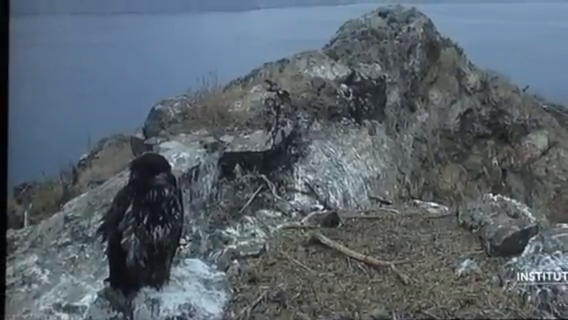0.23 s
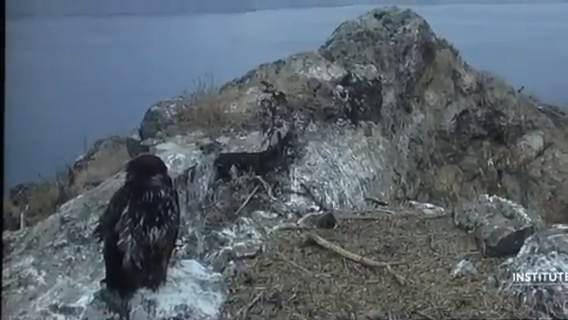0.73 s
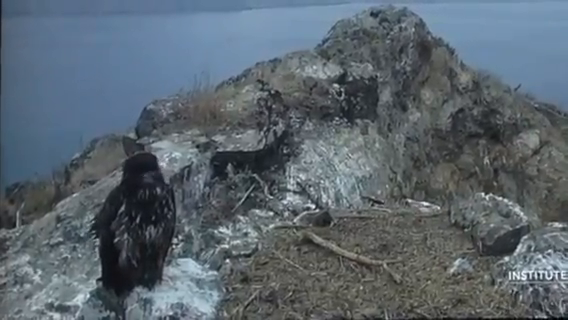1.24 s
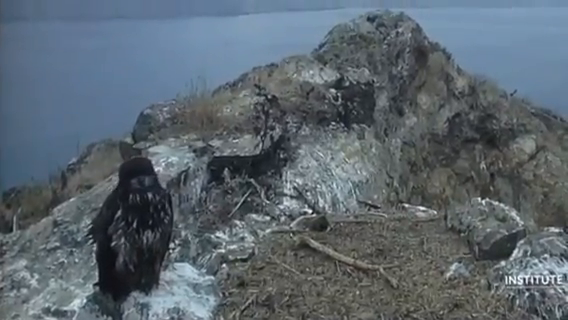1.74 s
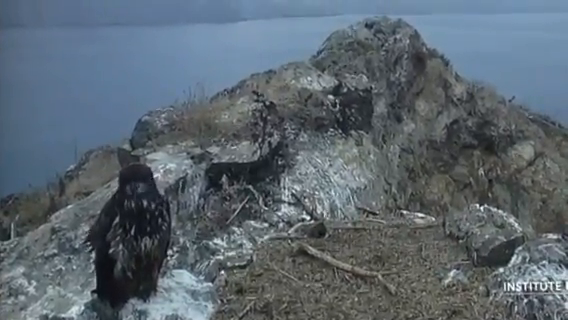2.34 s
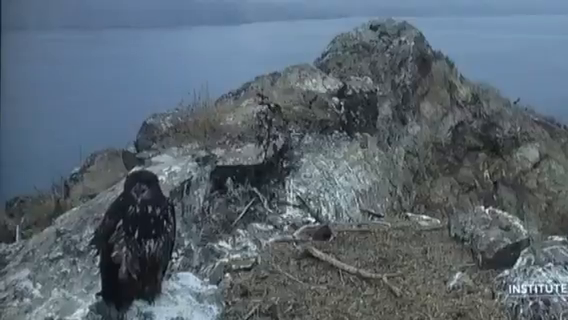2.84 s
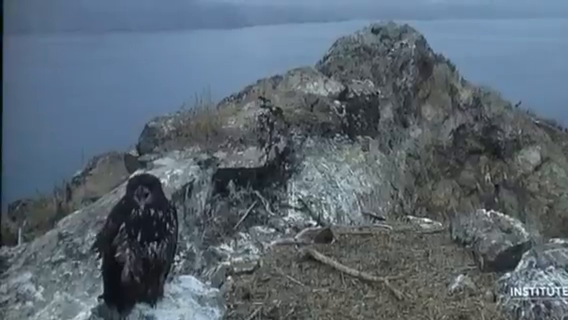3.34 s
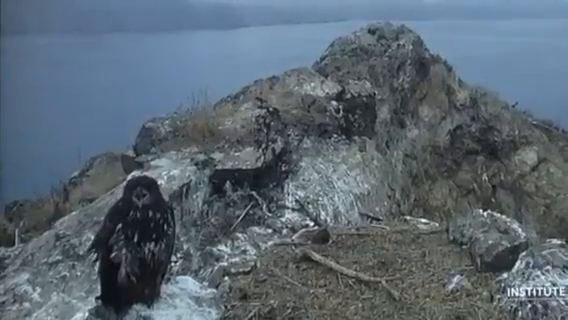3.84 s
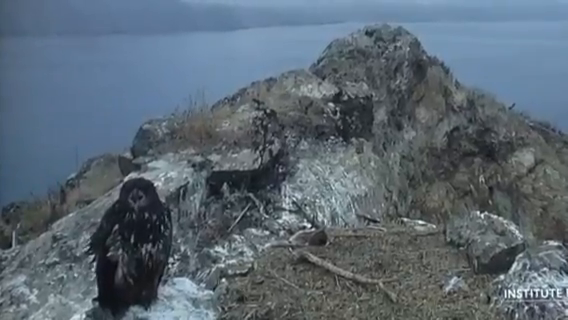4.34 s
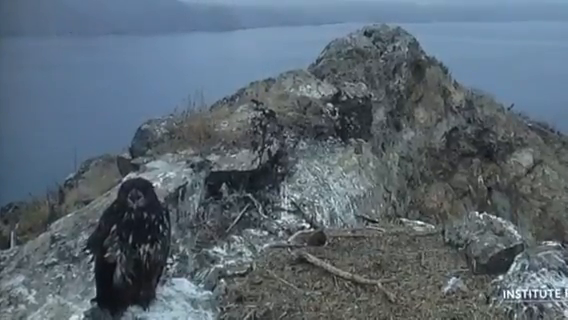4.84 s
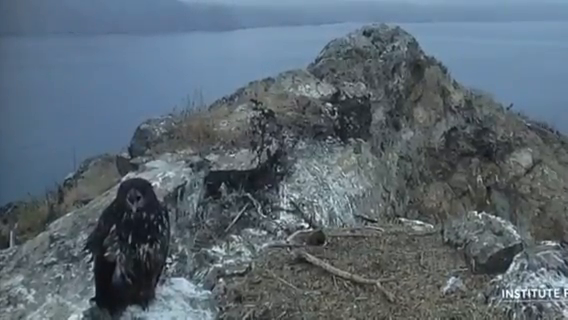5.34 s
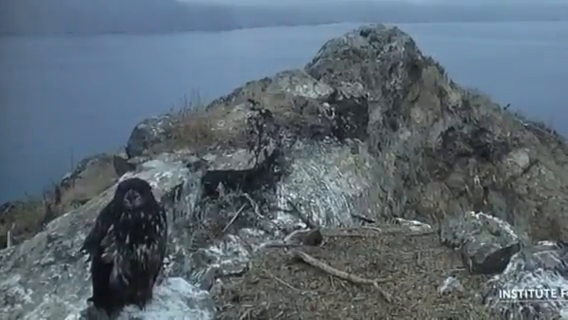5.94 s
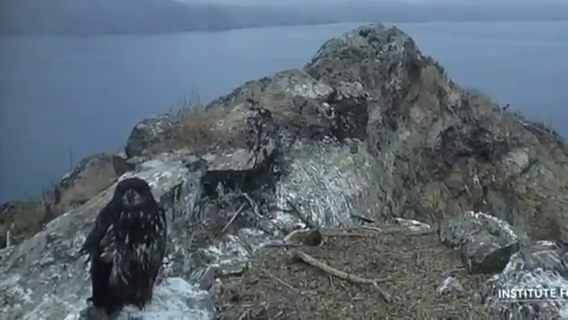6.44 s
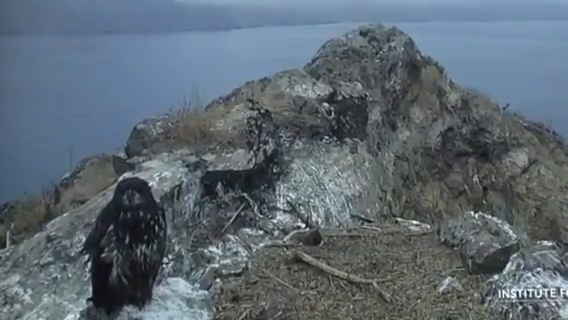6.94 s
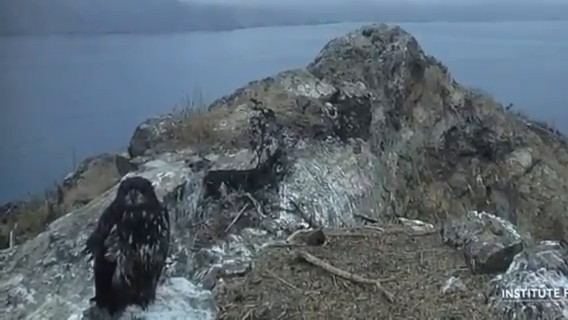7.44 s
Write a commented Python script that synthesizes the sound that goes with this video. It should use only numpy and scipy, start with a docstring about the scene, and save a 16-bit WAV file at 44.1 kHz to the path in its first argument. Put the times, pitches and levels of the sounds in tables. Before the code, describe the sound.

After seconds of dull, booming sea wash, a juvenile eagle pipes a quick bout of harsh, distorted whistles through a small speaker indoors.

```python
"""A young eagle on a sea cliff pipes twelve quick calls, over a steady wash of sea and hiss.
Each call is a low croak, a yelp, an arched whistle and a drop to a short low note with a falling grunt, all
voiced as harmonics coloured by throat and beak; the voice warms up over the bout. The wash is shaped noise.
The whistles overload the microphone at the nest: clipping adds shrill odd overtones and squeezes out the wash.
The microphone signal plays from a small loudspeaker in a room, and gain control evens the result."""
import sys
import numpy as np
from scipy import signal
from scipy.fft import rfft, irfft
from scipy.io import wavfile
from scipy.ndimage import uniform_filter1d

SR = 44100
rng = np.random.default_rng(int(sys.argv[2]) if len(sys.argv) > 2 else 0)


def wrap_up_sound(samples):
    """Save the sound to the file named by the first command line argument, as 16-bit audio."""
    columns = np.atleast_2d(samples).T
    # keep every value between -1 and 1, then stretch to whole-number steps
    tamed = np.clip(columns, -1, 1)
    steps = np.round(tamed * 32767).astype(np.int16)
    wavfile.write(sys.argv[1], SR, steps)


N = 339349
TIME = np.arange(N) / SR  # s
BIN_HZ = np.maximum(np.arange(N // 2 + 1) * SR / N, 1)

# sea wash and hiss, spectrum shape before it is scaled to its level: [f/Hz, relative density level/dB]
WASH_SPECTRUM = [(20, -78), (57, -21.5), (112, -22), (160, -8), (235, -13), (300, -25.5), (400, -12.5),
                 (630, -13), (950, -20), (2600, -22), (4300, -22.5), (5500, -21), (8250, -31),
                 (10000, -21.5), (15500, -39)]
# boom and ringing in the wash, on the same relative scale: [f/Hz, width at half power/Hz, level/dB]
WASH_RESONANCES = [(164, 23, -1), (185.1, 24.7, 2.5), (456, 81, -9), (628, 28, -13), (1147, 82, -15),
                   (2270, 140, -13.5), (3950, 180, -20.5), (4434, 230, -16)]
# nearby surfaces, extra path about 1 to 14 m: [t/s after the direct sound, level/dB re direct]
REFLECTIONS = [(.0031, -9), (.0074, -11.5), (0.0114, -15.5), (0.019, -16.5), (.042, -24.5)]
# strongest room resonances: [f/Hz, level/dB before the common ringing level, t60/s]
ROOM_MODES = [(1603, -2, 0.69), (1643, -7.5, 0.12), (1767, 1, 0.14), (2027, 4.5, 0.1), (2160, -17, 0.34),
              (2425, -3.5, 0.35), (2542, 3.5, 0.31), (2530, -9, 0.12), (2680, -19.5, 0.99), (2838, 6, 0.16),
              (2971, -9, 0.035), (3345, 3.5, 0.043), (4018, 6, 0.062)]
# loudspeaker treble response: [f/Hz, level/dB]
SPEAKER_TREBLE = [(3000, 0), (5500, -1), (6700, -3.5), (7400, 6.5), (8250, 10), (9200, -2), (11000, 0.5),
                  (12800, 0), (13800, 6.5), (15500, -2)]
# colour of the voice through throat and beak: [f/Hz, level/dB]
VOICE_COLOUR = [(400, -24), (700, -21.5), (1050, -5), (1250, -35.5), (1650, -19.5), (2050, -9.5), (2400, 0),
                (2850, 1), (3300, -3.5), (3650, -38), (4100, -10.5), (4700, -29), (5600, -15), (6700, -23)]
# calls: [start t/s, yelp before the whistle t/s, whistle length t/s, flick above base f/Hz (none if negative),
#         crest f/Hz, low note f/Hz, effort level/dB re overload before voice colour, yelp level/dB likewise]
CALLS = [ (2.493, .038, 0.024, 0.5, 2104, 1960, 8.5, 4.5), (2.737, 0.017, 0.064, -1, 2447, 2040, 1, 5),
         (3.052, 0.016, 0.11, -0.5, 2671, 1977, 5, 5), (3.408, 0.0044, 0.12, 331, 2721, 1976, 6.5, -4.5),
         (3.757, 0.0031, .144, 220, 2774, 1972, 7.5, -6.5),
         (4.125, 0.0044, 0.13, 223.5, 2800, 1956, 7, -9.5), (4.465, 0.0058, 0.12, 207, 2781, 2000, 8, -7),
         (4.8, 0.0051, .110, 194.5, 2786, 1987, 8.5, -7), (5.122, .006, 0.1, 166.5, 2735, 2023, 7.5, -6.5),
         (5.416, 0.0045, 0.099, 142, 2734, 2020, 7.5, -10), (5.706, .009, 0.066, 386, 2750, 1866, 4.5, -12),
         (5.914, 0.0082, .059, 674, 2712, 1833, 2, -19)]

WASH_DB = -35.5  # rms, re overload
PLAYBACK_DB = -19.5
CUTOFF_HZ = 15450
# dull echo off the far wall, extra path about 23 m
FAR_WALL_S, FAR_WALL_DB, FAR_WALL_HZ = 0.068, -18.5, 3000
# time constant over which the cold voice warms up
WARM_UP_S = 1.6
# croak: a rough rise leading into the yelp, weaker while cold
CROAK_LEAD_S, CROAK_RISE_S, CROAK_RELEASE_S = 0.020, 0.016, 0.026
CROAK_FROM_HZ, CROAK_TO_HZ, CROAK_DB, CROAK_COLD_DB = 490, 737, -2.5, -10.5
# yelp: a short rise
YELP_FROM_HZ, YELP_TO_HZ, YELP_SHORTEST_S, YELP_EDGE_S = 1420, 1672.5, 0.0152, 0.0054
# most whistles flick up past their base pitch and settle back
FLICK_RISE_HZ, FLICK_S, SETTLE_S = 603.7, 0.01166, 0.018
# then climb from the base, flatter while cold, to the crest and sag part of the way to the low note
BASE_HZ, COLD_FLAT_HZ, SAG_S, SAG_SHARE = 2742, 416, 0.04244, 0.428
# swell of the whistle: share of the effort in dB once open, and at its end
ATTACK_S, OPEN_SHARE, END_SHARE = 0.0062, 0.46, 0.34
# drop to the low note, held briefly
DROP_S, LOW_HOLD_S, LOW_RELEASE_S, LOW_SAG_HZ_PER_S, LOW_DB = 0.005, 0.024, 0.004, 7300, -3.5
# last falling grunt, stronger while cold
GRUNT_AFTER_S, GRUNT_S, GRUNT_FROM_HZ, GRUNT_TO_HZ = 0.0098, 0.02, 1330, 1028
GRUNT_DB, GRUNT_COLD_DB = -10.5, 16.5


def from_db(db):
    """Decibels to amplitude gain."""
    return 10 ** (np.asarray(db) / 20)


def rms_one(x):
    """Scale to unit rms."""
    return x / np.sqrt(np.mean(x ** 2) + 1e-20)


def colour(points, peaks, hz):
    """Gain of a broad spectrum with bell-shaped resonances added in power."""
    at_hz, level_db = np.transpose(points)
    broad = from_db(np.interp(np.log(hz), np.log(at_hz), level_db))
    bells = 0
    for centre, width, db in peaks:
        bells = bells + from_db(db) ** 2 * 2 ** -(2 * (hz - centre) / width) ** 2
    return np.sqrt(broad ** 2 + bells)


def drift(rate_hz, size):
    """Smooth random wandering of spread 1: noise through two equal one-pole low-passes."""
    r = np.exp(-2 * np.pi * rate_hz / SR)
    noise = rng.standard_normal(size + SR // 10)  # the extra start lets the filter settle
    return rms_one(signal.lfilter([1], [1, -2 * r, r * r], noise))[-size:]


def fade_db(t, on, off, attack, release):
    """Level in dB that rises from -30, holds at 0 from on to off, and falls back."""
    off = max(on, off)
    return np.interp(t, [on - attack, on, off, off + release], [-30, 0, 0, -30])


def wash():
    """Steady sea noise and hiss with a low boom: white noise shaped by a fixed spectrum."""
    spectrum = rfft(rng.standard_normal(N)) * colour(WASH_SPECTRUM, WASH_RESONANCES, BIN_HZ)
    return from_db(WASH_DB) * rms_one(irfft(spectrum, N))


def resonance(x, hz, t60):
    """A ringing band-pass with gain 1 at its centre."""
    r = from_db(-60 / (t60 * SR))
    feed = np.array([1, 0, -1]) * (1 - r * r) / 2
    return signal.lfilter(feed, [1, -2 * r * np.cos(2 * np.pi * hz / SR), r * r], x)


def reverberation(x, t60, gap, treble_hz):
    """Dense random echoes that build up after a gap and die away, duller than the direct sound."""
    t = TIME[:SR]
    echoes = rng.standard_normal(SR) * from_db(-60 * t / t60) * np.clip(t / gap - 1, 0, 1)
    wet = signal.fftconvolve(x, echoes / np.linalg.norm(echoes))[:N]
    return signal.sosfilt(signal.butter(1, min(treble_hz, 0.45 * SR), fs=SR, output="sos"), wet)


def room(x, ring_db, near_db, far_db):
    """Direct sound, reflections, far-wall echo, resonances, a short reverberation and a faint long tail."""
    early = sum(from_db(db) * np.interp(TIME - delay, TIME, x) for delay, db in REFLECTIONS)
    dull = signal.sosfilt(signal.butter(2, FAR_WALL_HZ, fs=SR, output="sos"), x)
    echo = from_db(FAR_WALL_DB) * np.interp(TIME - FAR_WALL_S, TIME, dull)
    modes = sum(from_db(db) * resonance(x, hz, t60) for hz, db, t60 in ROOM_MODES)
    ringing = from_db(ring_db) * modes
    near = from_db(near_db) * reverberation(x, t60=0.2, gap=0.0059, treble_hz=3600)
    far = from_db(far_db) * reverberation(x, t60=3.47, gap=0.044, treble_hz=2500)
    return x + early + echo + ringing + near + far


def loudspeaker(x):
    """A small loudspeaker: no deep bass, and an uneven treble with a shrill peak."""
    bright = irfft(rfft(x) * colour(SPEAKER_TREBLE, [], BIN_HZ), N)
    return signal.sosfilt(signal.butter(3, 54, "high", fs=SR, output="sos"), bright)


def overload(x, offset, oversampling=4):
    """Microphone overload: slightly lopsided clipping near height 1, at a raised sample rate."""
    fine = signal.resample_poly(x, oversampling, 1)
    clipped = np.clip(fine, offset - 1, offset + 1)
    return signal.resample_poly(clipped, 1, oversampling)


def gain_control(x, threshold_db, slope, release_db_per_s, attack_s):
    """Turns down quickly above the threshold and recovers at a steady rate in dB."""
    level_db = 10 * np.log10(np.maximum(uniform_filter1d(x ** 2, size=128), 1e-12))
    cut_db = slope * np.maximum(level_db - threshold_db, 0)
    recovery_db = release_db_per_s * TIME
    held_db = np.maximum.accumulate(cut_db + recovery_db) - recovery_db
    r = np.exp(-1 / (attack_s * SR))
    return x * from_db(-signal.lfilter([1 - r], [1, -r], held_db))


def syrinx(times, pitches, levels_db, jitter, jitter_hz, count=3):
    """One voiced gesture: membrane harmonics falling as 1/k, unsteady in pitch, heard through the throat."""
    times = np.maximum.accumulate(times)
    span = slice(int(times[0] * SR), int(times[-1] * SR))
    t, out = TIME[span], np.zeros(N)
    # the membrane flutters roughly until it settles
    unsteady = jitter + 0.033 * np.exp(-(t - t[0]) / 0.015)
    pitch = np.interp(t, times, pitches) * np.exp(unsteady * drift(jitter_hz, len(t)))
    phase = 2 * np.pi * np.cumsum(pitch) / SR
    tone = 0
    for k in range(1, count + 1):
        tone = tone + colour(VOICE_COLOUR, [], k * pitch) * np.sin(k * phase) / k
    gain = from_db(np.interp(t, times, levels_db))
    out[span] = tone * uniform_filter1d(gain, size=96, mode="constant")
    return out


def croak(start, cold):
    """A rough low rise, rich in overtones."""
    begin = start - CROAK_LEAD_S
    top = begin + CROAK_RISE_S
    t = np.linspace(begin, top + CROAK_RELEASE_S)
    pitch = np.interp(t, [begin, top], [CROAK_FROM_HZ, CROAK_TO_HZ])
    fade = fade_db(t, begin + 0.009, top, attack=0.014, release=0.024)
    level_db = CROAK_DB + CROAK_COLD_DB * cold + fade
    return syrinx(t, pitch, level_db, jitter=0.012, jitter_hz=400, count=6)


def yelp(start, length, level_db):
    """A rising note whose second harmonic carries the sound."""
    end = start + max(length, YELP_SHORTEST_S)
    t = np.linspace(start - YELP_EDGE_S, end + YELP_EDGE_S)
    rise = np.sin(np.interp(t, [start, end], [0, np.pi / 2]))
    pitch = YELP_FROM_HZ + (YELP_TO_HZ - YELP_FROM_HZ) * rise
    fade = fade_db(t, start, end, YELP_EDGE_S, YELP_EDGE_S)
    return syrinx(t, pitch, level_db + fade, jitter=0.018, jitter_hz=434)


def whistle_pitch(t, length, flick_hz, crest_hz, low_hz, cold):
    """A flick if any, a climb to the crest, a quickening sag and a drop to the low note."""
    crest = length - SAG_S
    base_hz = min(BASE_HZ - COLD_FLAT_HZ * cold, crest_hz)
    arch = np.interp(t, [SETTLE_S, max(crest, SETTLE_S + DROP_S)], [base_hz, crest_hz])
    sag = SAG_SHARE * (crest_hz - low_hz) * np.clip((t - crest) / SAG_S, 0, 1) ** 2.46
    flick = np.interp(t, [ATTACK_S / 2, FLICK_S, SETTLE_S], [flick_hz - FLICK_RISE_HZ, flick_hz, 0])
    high = arch + flick * (flick_hz > 0) - sag
    low = low_hz - LOW_SAG_HZ_PER_S * (t - length - LOW_HOLD_S / 2)
    dropped = np.clip((t - length) / DROP_S + 0.5, 0, 1)
    return (1 - dropped) * high + dropped * low


def whistle(start, length, flick_hz, crest_hz, low_hz, effort_db, cold):
    """The pressure swells to the crest and runs out on the low note."""
    low_end = length + LOW_HOLD_S
    t = np.linspace(-ATTACK_S / 2, low_end + LOW_RELEASE_S, 200)
    swell_db = np.interp(t, [0, FLICK_S, max(length - SAG_S, SETTLE_S), length - DROP_S, length],
                         [0, OPEN_SHARE * effort_db, effort_db, END_SHARE * effort_db, LOW_DB])
    level_db = swell_db + fade_db(t, ATTACK_S / 2, low_end, ATTACK_S, LOW_RELEASE_S)
    pitch = whistle_pitch(t, length, flick_hz, crest_hz, low_hz, cold)
    return syrinx(start + t, pitch, level_db, jitter=0.00067, jitter_hz=153, count=2)


def grunt(start, cold):
    """The voice falls away below the low note, on its fundamental alone."""
    t = np.linspace(start, start + GRUNT_S)
    middle = start + GRUNT_S / 2
    pitch = np.linspace(GRUNT_FROM_HZ, GRUNT_TO_HZ)
    fade = fade_db(t, middle, middle, attack=0.019, release=0.0083)
    level_db = GRUNT_DB + GRUNT_COLD_DB * cold + fade
    return syrinx(t, pitch, level_db, jitter=0.0039, jitter_hz=150, count=1)


def call(start, yelp_s, length, flick_hz, crest_hz, low_hz, effort_db, yelp_db):
    """Croak, yelp, whistle and grunt in one go, from a voice that is coldest on the first call."""
    cold = np.exp(-(start - CALLS[0][0]) / WARM_UP_S)
    whistle_start = start + yelp_s
    opening = croak(start, cold) + yelp(start, yelp_s, yelp_db)
    piping = whistle(whistle_start, length, flick_hz, crest_hz, low_hz, effort_db, cold)
    return opening + piping + grunt(whistle_start + length + GRUNT_AFTER_S, cold)


def scene():
    """Calls and wash overload the nest microphone and play from the loudspeaker into the room."""
    eagle = sum(call(*row) for row in CALLS)
    played = loudspeaker(overload(eagle + wash(), offset=0.036))
    return from_db(PLAYBACK_DB) * room(played, ring_db=4.5, near_db=-1, far_db=-24)[None]


def record(dry):
    """A quick limiter evens the loudest moments, a slow one keeps the wash down; the top is cut steeply."""
    limited = gain_control(dry[0], threshold_db=-16.0, slope=0.64, release_db_per_s=52, attack_s=0.0017)
    even = gain_control(limited, threshold_db=-27, slope=0.41, release_db_per_s=13.5, attack_s=0.0023)
    top_cut = signal.ellip(12, 0.1, 80, CUTOFF_HZ, fs=SR, output="sos")
    return signal.sosfilt(top_cut, even)[None]


dry = scene()
out = record(dry)
wrap_up_sound(out)
```